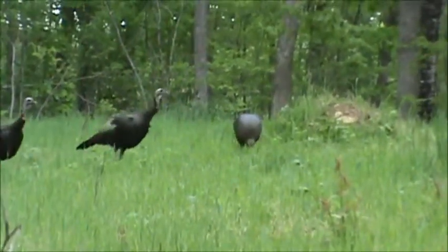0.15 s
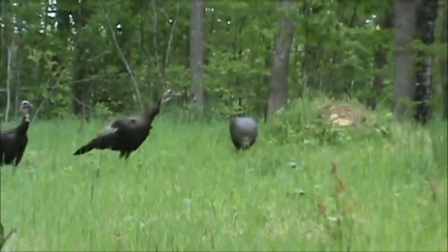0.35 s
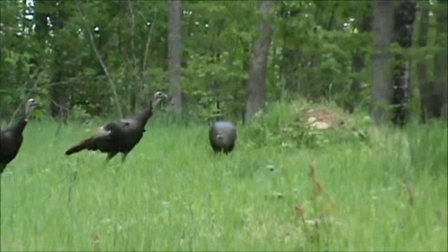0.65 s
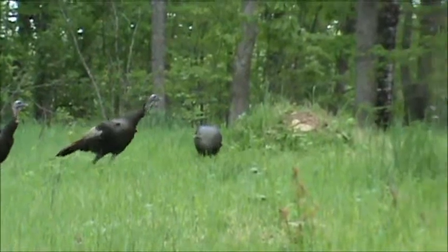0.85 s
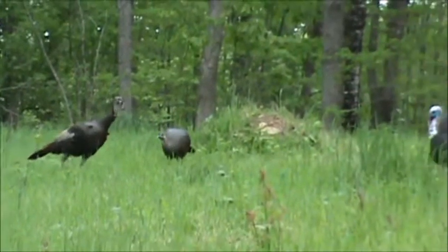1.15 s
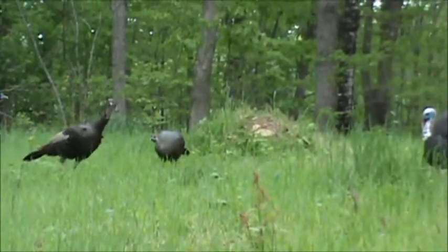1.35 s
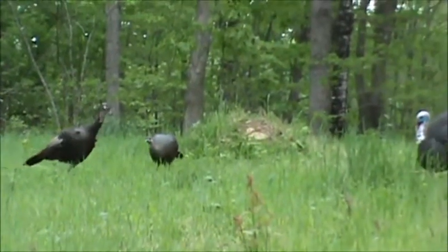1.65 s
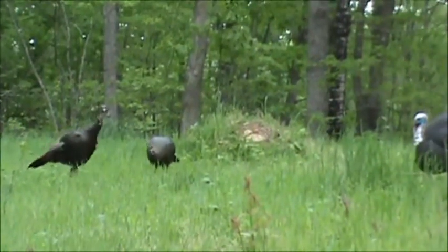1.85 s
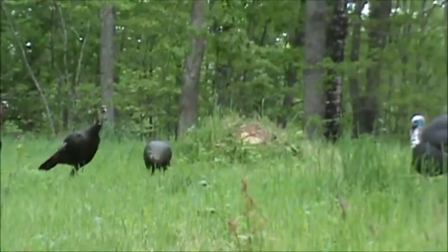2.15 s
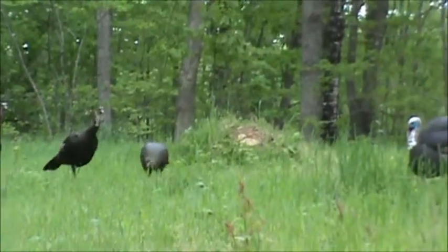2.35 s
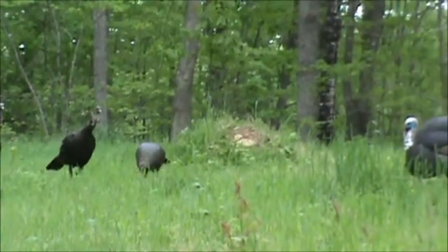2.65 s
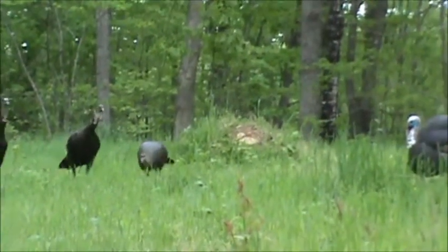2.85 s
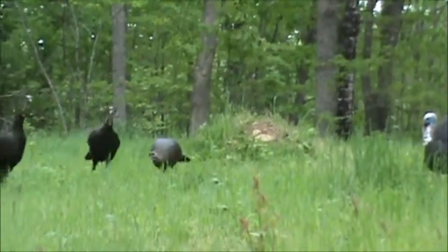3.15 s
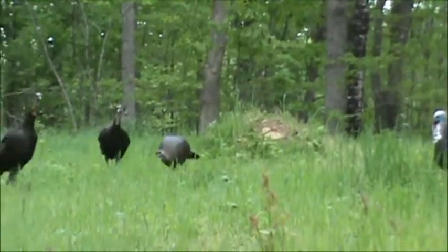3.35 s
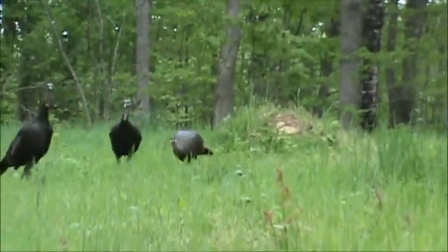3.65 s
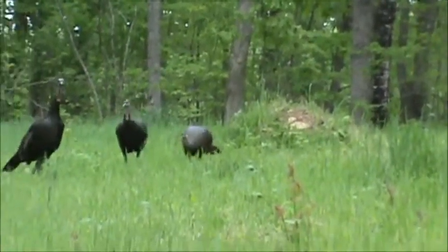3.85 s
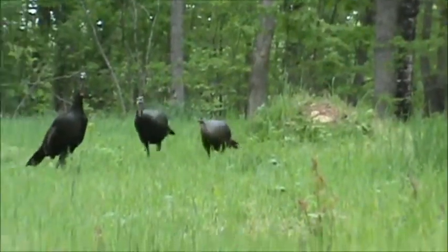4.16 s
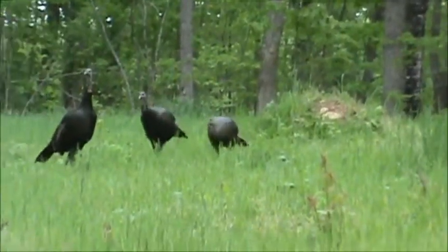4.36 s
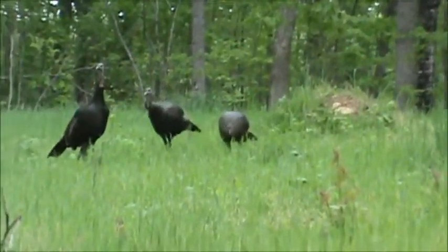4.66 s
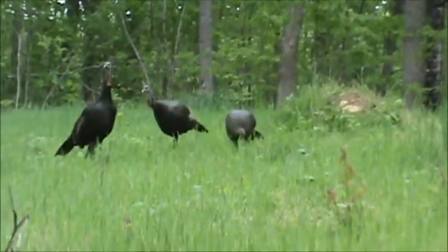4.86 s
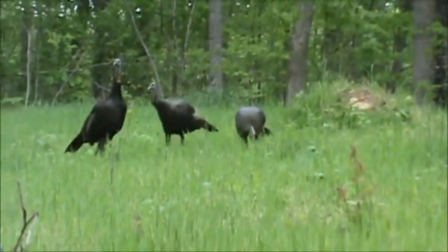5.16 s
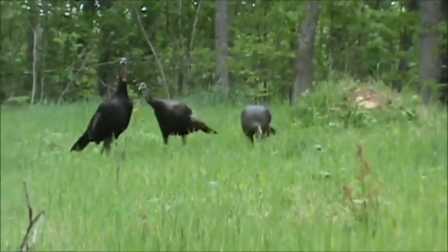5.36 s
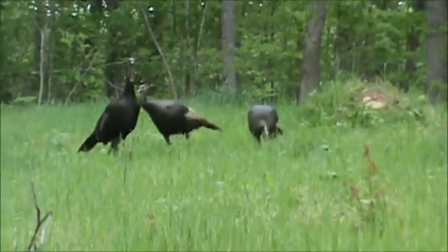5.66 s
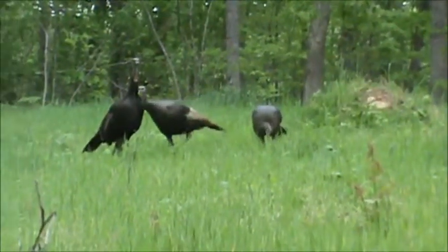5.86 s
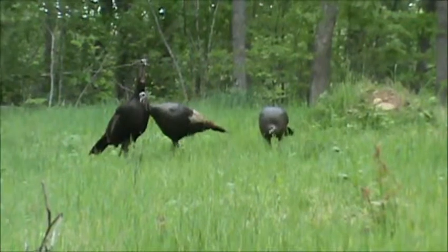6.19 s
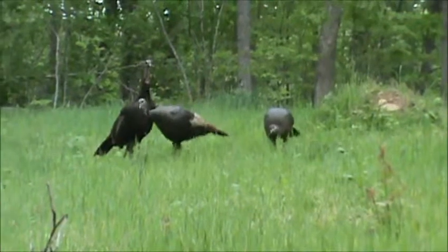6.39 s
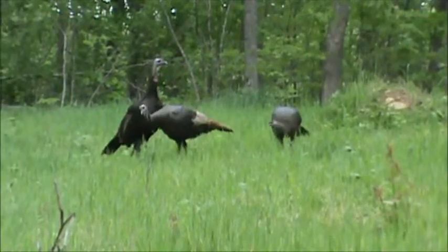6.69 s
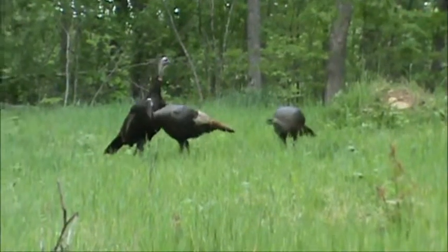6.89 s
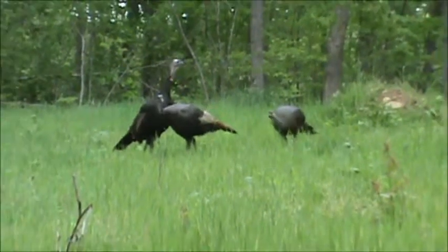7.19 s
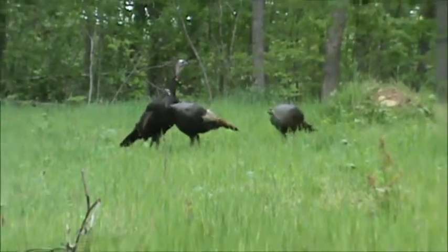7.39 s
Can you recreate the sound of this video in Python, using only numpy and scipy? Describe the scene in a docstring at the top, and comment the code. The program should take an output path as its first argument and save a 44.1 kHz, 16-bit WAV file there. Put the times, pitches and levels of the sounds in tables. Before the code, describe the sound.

A quiet grassy clearing by woods, heard through an outdoor stereo microphone with low rumble, steady hiss and a barely noticeable hum and thin whine. Faint rattling and light ticks open the scene. From 0.7 s a warbler, slightly left, repeats a quick, high swooping phrase about every quarter second, growing until 2 s, then steady to about 3.1 s. Fluty, quavering and slurred whistles overlap it, echoing from the trunks. Soft turkey-like purrs come around 1.3 to 2 s and 3.1 to 3.7 s; a sharp close knock lands at 1.75 s. A gentle breeze rumble swells around 2.7 s. After a sparser stretch, distant slurred notes appear at 4 s and small taps at 4.7 to 5 s. Fluty whistles slide at 5.3 s, a rapid thin trill fades from 5.7 to 6.2 s, and a lilting figure repeats on the right until the end.

```python
"""A warbler at a wood's edge repeats one quick, swooping phrase, growing louder and then holding steady.
Other songbirds whistle and trill; every song is gliding near-pure tones with a scattered echo from the trunks.
Soft rattles, like a turkey's purr, are uneven pulses through throat resonances; close taps are damped noise bursts.
Beneath lie shaped noise (rumble swelling once with the breeze, steady hiss), a faint hum and a thin whine."""
import sys
import numpy as np
from scipy import signal
from scipy.fft import rfft, irfft, next_fast_len
from scipy.io import wavfile
from scipy.ndimage import uniform_filter1d

SR = 44100
rng = np.random.default_rng(int(sys.argv[2]) if len(sys.argv) > 2 else 0)


def file_out(sig):
    """Save sig as 16-bit WAV at sys.argv[1]."""
    # one column per channel
    cols = np.atleast_2d(sig).T
    # limit, then scale
    lim = np.clip(cols, -1, 1)
    pcm = np.round(lim * 32767).astype(np.int16)
    wavfile.write(sys.argv[1], SR, pcm)


N = 332073
TIME = np.arange(N) / SR


def undb(db):
    """Decibels to amplitude gain."""
    return 10 ** (np.asarray(db) / 20)


def unit(x):
    """Scale to rms 1."""
    return x / np.sqrt(np.mean(x ** 2) + 1e-18)


def add(out, start_s, x):
    """Mix x into out from start_s on."""
    i = min(max(int(start_s * SR), 0), N)
    out[i:i + len(x)] += x[:N - i]


def walk(rate_hz, size=N):
    """Smoothed random steps, rate_hz new values a second, spread near 1."""
    step = max(int(SR / rate_hz), 1)
    held = np.repeat(rng.standard_normal(size // step + 2), step)
    return 1.2 * uniform_filter1d(held, step)[:size]


def resonate(x, hz, width_hz):
    """A resonance applied twice, for steep skirts; width_hz is that of one pass."""
    b, a = signal.iirpeak(min(hz, .45 * SR), hz / min(width_hz, SR / 4), fs=SR)
    once = signal.lfilter(b, a, x)
    return signal.lfilter(b, a, once)


def colour(x, points):
    """Filter by a (frequency [Hz], gain [dB]) outline, interpolated on log frequency."""
    hz, db = np.transpose(points)
    size = next_fast_len(N)
    bins_hz = np.maximum(np.fft.rfftfreq(size, 1 / SR), 1)
    gain = undb(np.interp(np.log(bins_hz), np.log(hz), db))
    return irfft(rfft(x, size) * gain, size)[:N]


def place(x, pan_db):
    """Spread over two channels; pan_db is left minus right."""
    return x * undb(np.array([[pan_db], [-pan_db]]) / 2)


def swoop(t, first_hz, middle_hz, last_hz):
    """Pitch of a slurred note: one parabolic arc through three pitches."""
    arc = np.polyfit([0, .5, 1], [first_hz, middle_hz, last_hz], 2)
    return np.polyval(arc, t / t[-1])


def settle(t, first_hz, held_hz):
    """Pitch of a held note: an exponential slide in, then steady."""
    settle_s = 0.0097
    return held_hz + (first_hz - held_hz) * np.exp(-t / settle_s)


def whistle(notes, glide, starts=((0, 0),), attack=.2, release=.2, waver=0.0057, flutter_db=2.0,
            quaver_hz=60, quaver=0, octave_db=-40):
    """A syrinx: a near-pure gliding tone with random pitch waver and level flutter."""
    # attack, release: shares of the note; waver, quaver: shares of the pitch
    out = np.zeros(N)
    for start_s, start_db in starts:
        for note_s, length_s, *hz, db in notes:
            t = np.arange(max(int(length_s * SR), 256)) / SR
            drift = waver * walk(300, len(t))
            shake = quaver * np.sin(2 * np.pi * quaver_hz * t)
            pitch_hz = glide(t, *hz) * (1 + drift + shake)
            phase = 2 * np.pi * np.cumsum(pitch_hz) / SR
            through = t / t[-1]
            swell = np.clip(np.minimum(through / attack, (1 - through) / release), 0, 1)
            loud = swell * undb(start_db + db + flutter_db * walk(156.5, len(t)))
            tone = np.sin(phase) + undb(octave_db) * np.sin(2 * phase)
            add(out, start_s + note_s, np.sqrt(2) * loud * tone)
    return out


def wood(x, pan_db, near_db, far_db, t60=2.8, near_s=0.044, echo_pan_db=2.0, likeness=0.49, direct_db=0):
    """Direct sound, quick scatter from nearby branches, and a long echo from the trunks."""
    t = np.arange(int(1.6 * SR)) / SR
    # sparse reflections, a few strong and many weak; likeness is the energy share common to both channels
    hits = rng.standard_normal((3, len(t))) * (rng.random((3, len(t))) < .04)
    hits = np.sqrt(likeness) * hits[0] + np.sqrt(1 - likeness) * hits[1:]
    near = place(unit(hits * np.exp(-t / near_s)), pan_db)
    build_up = 1 - np.exp(-t / 0.015)
    far = place(unit(hits * undb(-60 * t / t60) * build_up), echo_pan_db)
    response = (undb(near_db) * near + undb(far_db) * far) / np.sqrt(len(t))
    echo = signal.fftconvolve(x[None], response, axes=1)[:, :N]
    return undb(direct_db) * place(x, pan_db) + echo


def slurring_bird():
    """Slurred whistles deep in the wood: arched glides, strongly echoed."""
    # (time [s], length [s], first [Hz], middle [Hz], last [Hz], level [dB])
    slurs = [(0, 0.08, 1767, 1910, 2180, -58.5), (.105, .09, 2750, 2880, 2900, -52),
             (.215, 0.098, 3600, 5212, 3990, -52), (.303, 0.089, 4000, 3090, 3220, -49.5),
             (.385, 0.063, 3200, 3887, 3970, -48.5), (2.435, 0.074, 2740, 2990, 2720, -42.5),
             (2.52, 0.096, 3090, 2834, 2532, -42), (2.595, 0.062, 2650, 2390, 2120, -44.5),
             (2.655, .075, 2250, 2567, 2393, -45.5), (3.555, 0.058, 2950, 3590, 3350, -62),
             (4.008, 0.071, 2450, 3690, 3010, -53), (4.105, .05, 3150, 3680, 3500, -46),
             (4.108, 0.028, 4120, 4950, 5040, -56), (4.135, .11, 3110, 2180, 2950, -57.5),
             (4.164, 0.014, 3460, 3455, 3700, -35), (4.203, .095, 3580, 3826, 3500, -42),
             (4.278, 0.057, 3650, 3170, 2530, -43), (4.335, 0.1, 2850, 2345, 2710, -51),
             (4.46, 0.055, 2750, 2924, 2950, -49.5), (4.79, 0.077, 4200, 2800, 3880, -60),
             (5.27, 0.086, 3900, 2810, 4000, -53), (5.403, 0.06, 5780, 4990, 4510, -53),
             (5.74, 0.097, 3590, 2580, 2013, -55), (5.89, 0.071, 3350, 4270, 5500, -50),
             (5.955, 0.068, 3900, 3050, 2430, -54), (6.805, 0.05, 3950, 3610, 3290, -55),
             (7.08, 0.079, 4500, 3550, 5100, -55), (7.178, 0.052, 3480, 3820, 4700, -51),
             (7.262, 0.039, 4400, 4980, 5300, -55), (7.335, 0.083, 2700, 3664, 3120, -51.5)]
    song = whistle(slurs, swoop, attack=0.083, release=0.067, waver=0.018, flutter_db=3.5)
    return wood(song, pan_db=2.0, near_db=-2.5, far_db=2.5, t60=1.05, near_s=0.014,
                echo_pan_db=0.5, likeness=0.49, direct_db=2.5)


def rattles(rate_hz=130, jitter=.3, rasp=0.13):
    """Uneven pulses and a little rasp ring a throat, as in a turkey's purr."""
    # (time [s], length [s], level [dB], upper resonance relative to that [dB])
    rattle_table = [(0, 0.5, -58, -19), (1.329, 0.096, -50.5, -15), (1.781, 0.089, -48, 4.5),
                    (1.838, 0.12, -45, -1), (3.13, 0.37, -53.5, -4.5), (3.493, 0.27, -57, -12)]
    # throat resonances: (centre [Hz], half-width [Hz], level [dB])
    throat = [(390, 110, 3.5), (800, 135, 10.5), (896, 120, 9.5)]
    effort, bright = np.zeros(N), np.zeros(N)
    for start_s, length_s, db, upper_db in rattle_table:
        swell = undb(db) * signal.windows.tukey(int(length_s * SR), .5)
        add(effort, start_s, swell)
        add(bright, start_s, swell * undb(upper_db))
    cycles = np.cumsum(rate_hz * (1 + jitter * walk(90))) / SR
    pulses = np.diff(np.floor(cycles), prepend=0) + rasp * rng.standard_normal(N)
    body = np.zeros(N)
    for hz, half_width_hz, db in throat:
        body += undb(db) * unit(resonate(pulses, hz, 2 * half_width_hz))
    upper = unit(resonate(pulses, hz=1740, width_hz=115))
    voice = effort * unit(body) + bright * upper
    return wood(voice, pan_db=3.5, near_db=-3.5, far_db=-18, near_s=0.023, likeness=0.55, direct_db=-0.5)


def stereo_noise(outline):
    """Coloured mid noise at rms 1 plus side noise, weakest in bass and top."""
    # (frequency [Hz], side minus mid [dB])
    side_outline = [(60, -36), (150, -17), (300, -2), (3000, -0.5), (6000, -5), (12000, -13.5)]
    mid = unit(colour(rng.standard_normal(N), outline))
    side = unit(colour(rng.standard_normal(N), outline))
    return mid + colour(side, side_outline) * np.array([[1], [-1]])


def breeze(calm_db=-60.5, rise_db=-49, peak_s=2.69, spread_s=1.11):
    """Low outdoor rumble: shaped noise whose level swells once on top of the calm."""
    # (frequency [Hz], relative density [dB per Hz])
    gust_outline = [(30, -39), (90, 6), (200, -9), (450, -8), (700, -14), (1500, -14), (4000, -18),
                    (15000, -18)]
    swell = np.exp(-((TIME - peak_s) / spread_s) ** 2)
    return (undb(calm_db) + undb(rise_db) * swell) * stereo_noise(gust_outline)


def air(bed_db=-45.5):
    """Steady rumble and hiss: noise under a fixed outline."""
    # (frequency [Hz], relative density [dB per Hz])
    air_outline = [(15, -32.5), (25, -7.5), (69, 4.5), (129, -5), (193, -10), (274, -9.5), (331, -13.5),
                   (469, -13), (684, -15), (1710, -15), (2920, -8.5), (3340, -14), (6920, -18.5),
                   (14300, -17.5), (15500, -13.5)]
    return undb(bed_db) * stereo_noise(air_outline)


def hum():
    """Faint low hum: narrow-band noise with a slowly wandering level."""
    level = undb(-65.5 + 0.83 * walk(1.1))
    return level * unit(resonate(rng.standard_normal(N), hz=99.3, width_hz=29))


def whine(level_db=-68):
    """Thin high whine: very narrow-band noise."""
    return undb(level_db) * unit(resonate(rng.standard_normal(N), hz=15735, width_hz=10))


def taps():
    """Each tap is a sharp push and a short crumble into one damped resonance."""
    # (time [s], peak level [dB], resonance [Hz], width [Hz], crumble's fall by 30 dB [s])
    tap_table = [(.17, -35.5, 5500, 4980, 0.01126), (.426, -29.5, 4995, 7060, .012),
                 (1.5228, -30, 366.7, 316, 0.0027), (1.5235, -29.5, 910, 1790, 0.019),
                 (1.662, -29.5, 995, 260, 0.0035), (1.7529, -17, 1654, 1453, 0.0032),
                 (1.7539, -26.5, 1220, 507, 0.052), (1.757, -13.5, 1510, 1902, 0.011),
                 (2.339, -40.5, 208, 170, 0.022), (2.352, -42.5, 1290, 120, .03),
                 (4.666, -40, 900, 700, 0.021), (4.687, -27.5, 5400, 7800, 0.02),
                 (4.824, -33, 2400, 1200, .015), (5.044, -36, 4500, 6000, .012)]
    out = np.zeros(N)
    t = np.arange(SR // 12) / SR
    for start_s, db, hz, width_hz, ring_s in tap_table:
        push = rng.standard_normal(len(t)) * np.exp(-np.log(1000) * t / (2 * ring_s))
        push[0] += 9
        tap = resonate(push, hz, width_hz)
        add(out, start_s, undb(db) * tap / np.abs(tap).max())
    return place(out, 4.3)


def fluty_bird():
    """Fluty whistles from the left: each slides into a held pitch."""
    # (time [s], length [s], first [Hz], held [Hz], level [dB])
    fluty = [(.625, 0.061, 1910, 1957, -46), (.684, 0.041, 1977, 2904, -33.5),
             (1.03, 0.084, 2803, 2576, -32.5), (1.1, 0.13, 2568, 2558, -44.5),
             (1.335, 0.05, 2505, 2560, -43.5), (2.105, 0.034, 2950, 2565, -42.5),
             (2.177, 0.039, 2535, 3030, -39), (2.376, 0.038, 2990, 2570, -44),
             (2.955, .037, 2890, 2567, -43.5), (3.14, 0.13, 1790, 1736, -54),
             (3.337, .038, 2876, 2880, -48), (3.375, 0.039, 2520, 2330, -48.5),
             (3.406, 0.051, 2097, 1960, -49), (3.492, 0.02, 2930, 2870, -49),
             (3.517, .025, 2430, 2380, -50), (3.544, 0.031, 2075, 1967, -49.5),
             (5.012, 0.031, 1700, 1560, -56), (5.168, 0.041, 1770, 1697, -50),
             (5.26, 0.13, 1690, 1650, -54.5), (5.308, 0.084, 1980, 2354, -35),
             (5.408, 0.054, 3770, 3500, -40.5), (5.458, 0.031, 3290, 2994, -32.5),
             (5.5, 0.035, 2270, 2040, -41), (5.545, 0.052, 2005, 1974, -43.5)]
    song = whistle(fluty, settle, attack=.3, release=0.16, waver=0.0048, flutter_db=1.0)
    return wood(song, pan_db=5.5, near_db=-2.5, far_db=-5.0, t60=1.8, likeness=0.55)


def warbler(soft_top_db=-10, full_s=2.07, leaves_db=-11):
    """Swooping strokes, highest ones held back until the song opens up; leaves dull the top."""
    # strokes: (time into phrase [s], length [s], first [Hz], middle [Hz], last [Hz], level [dB])
    phrase = [(.007, .025, 9050, 6875, 6390, -9.5), (.036, .014, 7390, 6150, 5430, -6.5),
              (.048, 0.0195, 5366, 4805, 4630, -3), (.117, .018, 8590, 5900, 3680, -7),
              (.135, .028, 3580, 4900, 6250, -5), (.175, 0.0236, 3300, 4075, 4270, -5.5),
              (.196, .021, 4210, 3440, 3190, -5)]
    # (time [s], level [dB])
    repeats = [(0.675, -51), (.947, -40.5), (1.213, -31), (1.481, -26), (1.757, -23.5), (2.034, -23),
               (2.3158, -22), (2.597, -22), (2.879, -22.5)]
    song = whistle(phrase, swoop, repeats, attack=0.05, release=0.06, waver=0.012,
                   flutter_db=2.0, octave_db=-24)
    song = colour(song, [(7000, 0), (9000, leaves_db)])
    soft = colour(song, [(4500, 0), (6000, 0), (7500, soft_top_db), (9000, 2 * soft_top_db)])
    effort = np.clip(TIME / full_s, 0, 1) ** 4
    song = soft + effort * (song - soft)
    return wood(song, pan_db=5.0, near_db=0, far_db=-1, t60=0.92, near_s=0.0064,
                echo_pan_db=1.5, likeness=0.47, direct_db=-5)


def quavering_bird():
    """High held whistles with a fast sinusoidal pitch quaver."""
    # (time [s], length [s], first [Hz], held [Hz], level [dB])
    quavers = [(.732, 0.21, 3900, 4020, -43.5), (.974, 0.0324, 4080, 3556, -38),
               (1.18, 0.0545, 3400, 3294, -41.5), (1.275, 0.066, 3290, 3513, -41)]
    song = whistle(quavers, settle, attack=0.061, release=0.073, waver=0.0032,
                   quaver_hz=60, quaver=0.022, flutter_db=3.5)
    return wood(song, pan_db=8.5, near_db=-5, far_db=4, t60=2.1, likeness=0.25, direct_db=0.5)


def chip_starts(count=11, start_s=5.688, every_s=.0499, level_db=-28.5, fade_db_per_s=45, first_db=-8):
    """(time [s], level [dB]) of each trill chip: evenly spaced and fading after a soft first one."""
    t = np.arange(count) * every_s
    return list(zip(start_s + t, level_db - fade_db_per_s * t + first_db * (t == 0)))


def trilling_bird():
    """Thin trill: fast chips, an upward flick above each, and a quick fall that starts within it and outlasts it."""
    # both: (time into chip [s], length [s], first [Hz], middle [Hz], last [Hz], level [dB])
    chip = [(0, 0.024, 6060, 5650, 5560, -9.5), (0, 0.024, 7160, 8180, 9100, -18.5)]
    chip_fall = [(.006, .034, 5404, 4030, 2800, -6.5)]
    trill = whistle(chip, swoop, chip_starts(), attack=0.33, release=0.36, waver=0.012)
    falls = whistle(chip_fall, swoop, chip_starts(), attack=0.39, release=0.31, waver=0.0218)
    trill = wood(trill, pan_db=7, near_db=-2.5, far_db=-11)
    falls = wood(falls, pan_db=6, near_db=-5, far_db=-8.0, near_s=0.087, likeness=0.35, direct_db=-9)
    return trill + falls


def lilting_bird():
    """Held opening notes, then a repeated figure from the right: a fall, an arch and a drop."""
    # (time [s], length [s], first [Hz], held [Hz], level [dB])
    opening = [(6.195, 0.08, 2494, 2505, -44.5), (6.28, .165, 1850, 1865, -60),
               (6.445, 0.025, 2130, 2165, -52), (6.54, 0.057, 3025, 3006, -54)]
    # (time into figure [s], length [s], first [Hz], middle [Hz], last [Hz], level [dB])
    figure = [(.005, 0.036, 3875, 2895, 2560, -6.5), (.074, 0.045, 2668, 3000, 2835, -4),
              (.122, .028, 2350, 2100, 2000, -12)]
    # (time [s], level [dB])
    figure_repeats = [(6.335, -57), (6.598, -45), (6.872, -42.5), (7.144, -42), (7.416, -41.5)]
    song = whistle(opening, settle, attack=0.14, waver=0.0031, flutter_db=3)
    song += whistle(figure, swoop, figure_repeats, attack=0.22, release=0.35, waver=.009)
    return wood(song, pan_db=-13.0, near_db=-2, far_db=-1, echo_pan_db=-3, likeness=0.42, direct_db=0)


def scene():
    """Birds in the trees, small sounds close by, and the open air."""
    birds = slurring_bird() + fluty_bird() + warbler() + quavering_bird() + trilling_bird() + lilting_bird()
    background = breeze() + air() + hum() + whine()
    return birds + rattles() + taps() + background


def record(dry):
    """Steep elliptic low-pass cuts the top."""
    sos = signal.ellip(10, .2, 70, 16000, fs=SR, output="sos")  # order, ripple dB, stopband dB, Hz
    return signal.sosfilt(sos, dry)


dry = scene()
out = record(dry)
file_out(out)
```